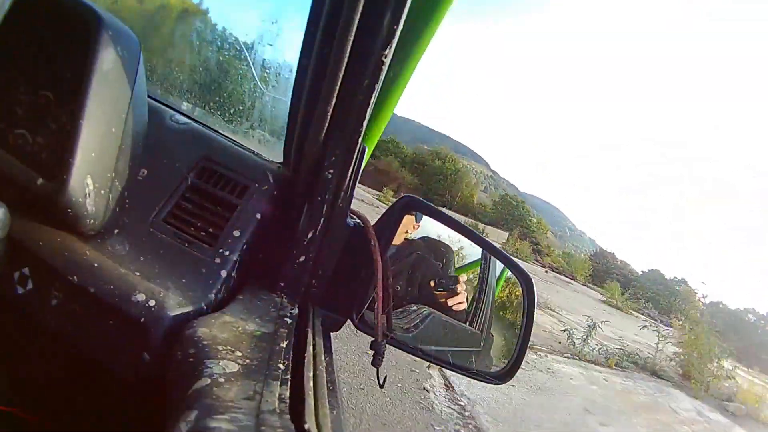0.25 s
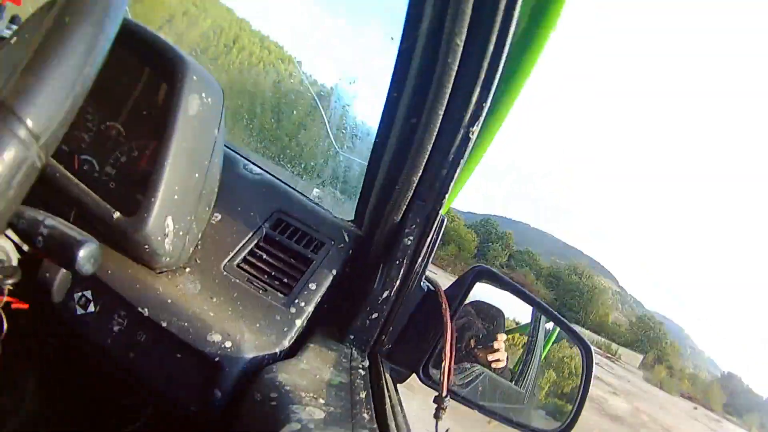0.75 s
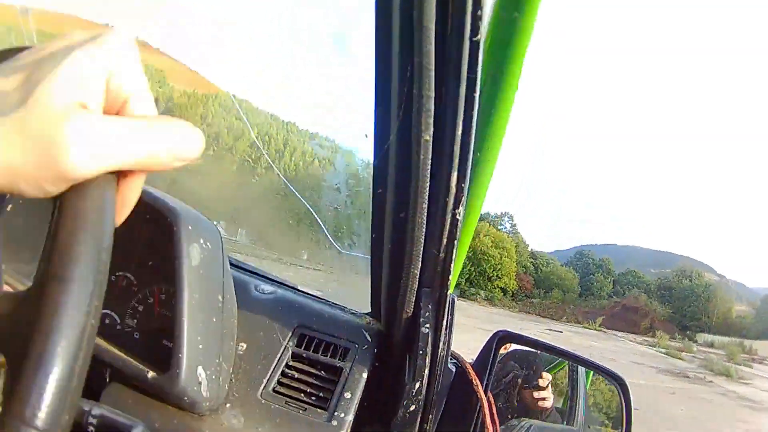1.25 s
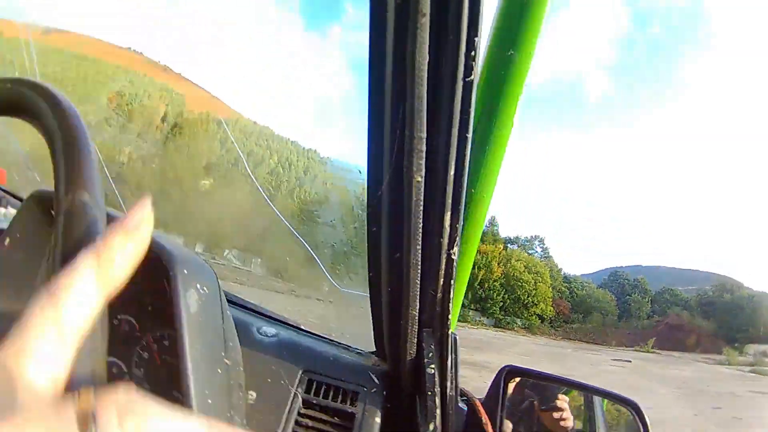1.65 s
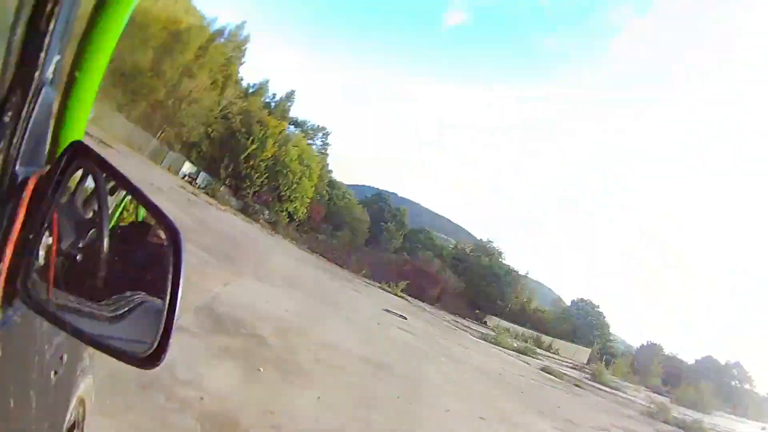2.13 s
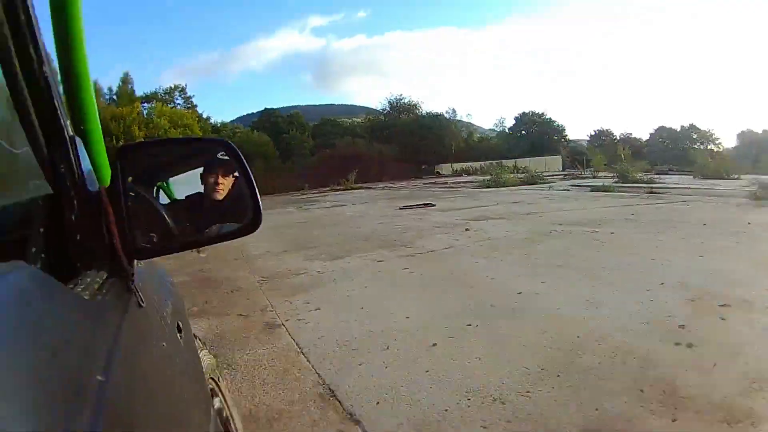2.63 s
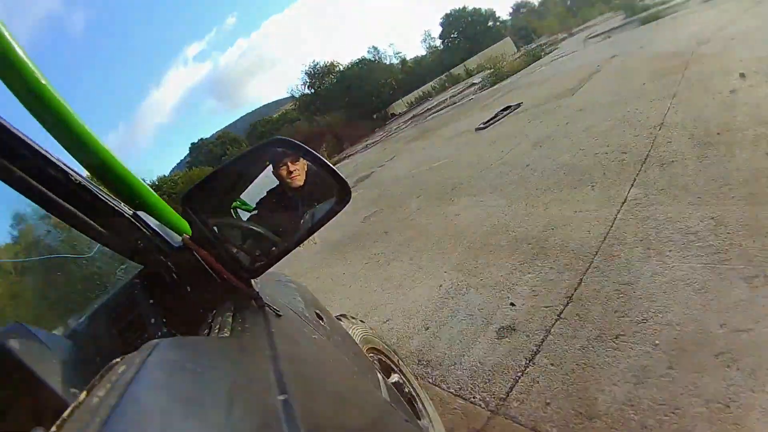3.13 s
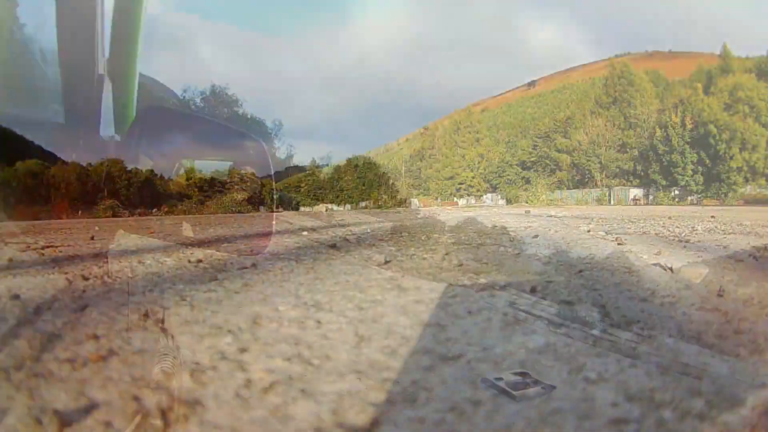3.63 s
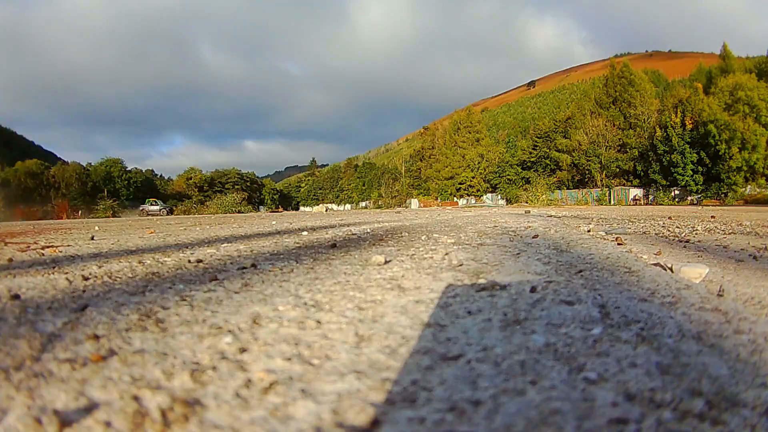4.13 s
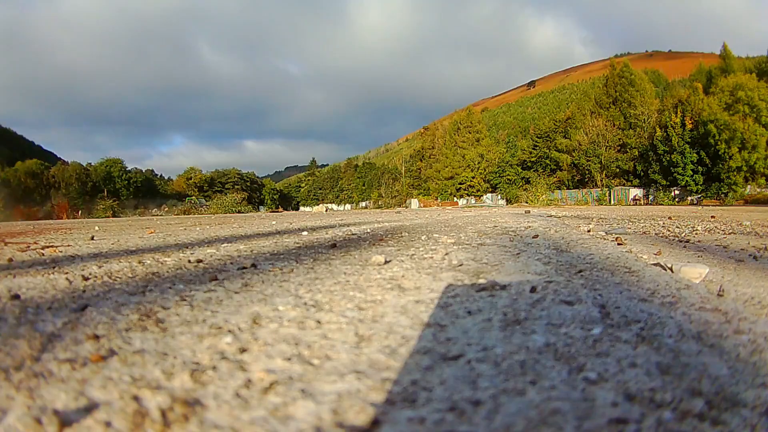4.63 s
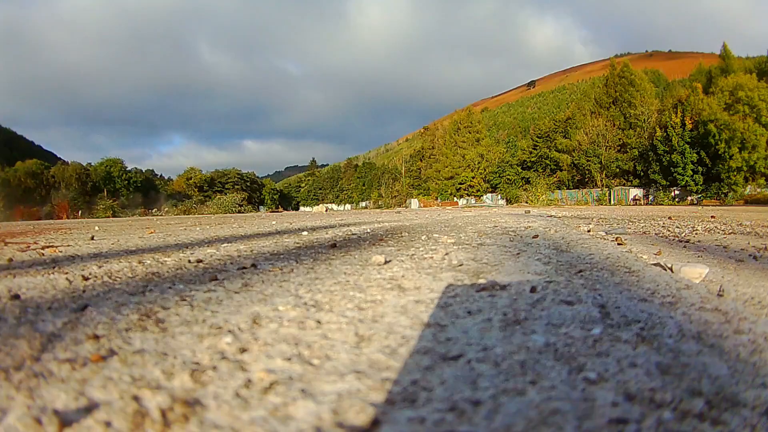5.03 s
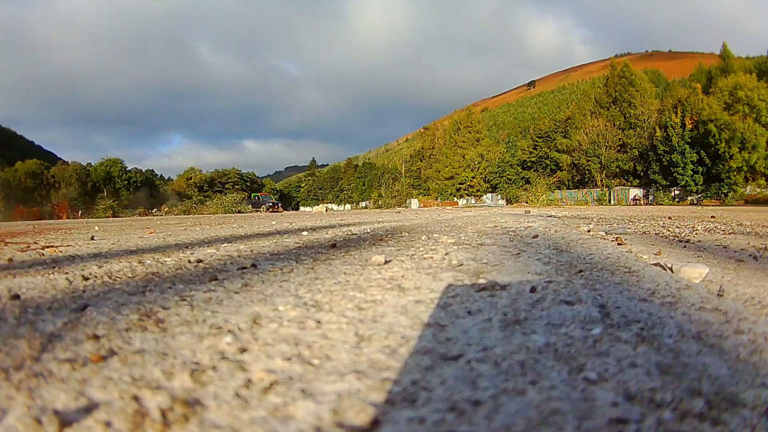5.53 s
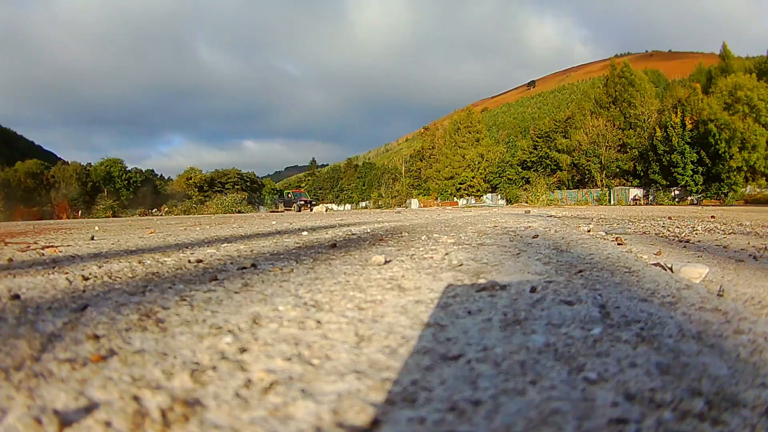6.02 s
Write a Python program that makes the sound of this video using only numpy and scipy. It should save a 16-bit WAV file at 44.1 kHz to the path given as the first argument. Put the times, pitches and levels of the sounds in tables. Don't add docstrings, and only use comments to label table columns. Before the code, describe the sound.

A small off-road car's exhaust blares and distorts up close, then suddenly sounds far across a concrete lot, revving steadily and dropping with burbles.

```python
import sys
import numpy as np
from scipy import signal
from scipy.fft import rfft, irfft, next_fast_len
from scipy.io import wavfile
from scipy.ndimage import uniform_filter1d

SR = 44100
rng = np.random.default_rng(int(sys.argv[2]) if len(sys.argv) > 2 else 0)


def field_ratio(decibels):
    return 10 ** (np.asarray(decibels, dtype=float) / 20)


def wav_record(signal):
    frames = np.transpose(np.atleast_2d(signal))
    bounded = np.clip(frames, -1, 1)
    quanta = np.round(bounded * 32767).astype(np.int16)
    wavfile.write(sys.argv[1], SR, quanta)


N = 276507
CUT_S = 3.535

# time_s, firing_hz
NEAR_FIRING = [(0.02, 152.6), (0.5, 135), (0.65, 129.6), (0.99, 120.7), (1.23, 102), (1.43, 87.7),
               (1.58, 97), (1.86, 97.4), (2.03, 99.8), (2.16, 91.4), (2.35, 104), (2.5, 102.5),
               (2.8, 108.0), (2.92, 112.6), (3.03, 98), (3.3, 90.2), (3.42, 88.4), (3.52, 100)]
FAR_FIRING = [(3.56, 119.8), (3.75, 123.8), (4.12, 135), (4.36, 141.3), (4.66, 140.1), (4.85, 145.8),
              (5.08, 143.4), (5.3, 145.5), (5.54, 143.1), (5.845, 139), (5.875, 126.8), (6.0, 110.2),
              (6.12, 87.3), (6.27, 84.5)]
# time_s, opening_0_to_1
NEAR_PEDAL = [(0.0, 0.57), (0.149, 0.93), (0.56, 0.91), (0.66, 0.7), (1.03, 0.76), (1.12, 0.97),
              (1.95, 0.92), (2.04, 0), (2.28, 0), (2.34, 0.95), (2.68, 0.97), (2.95, 0.39), (3.1, 0.03),
              (3.36, 0.25), (3.48, 0.94)]
FAR_PEDAL = [(3.55, 0.69), (3.75, 0.96), (4.5, 1), (5.2, 1.004), (5.72, 0.96), (5.84, 0.99), (5.86, 0.65),
             (6.27, 0.055)]
# centre_s, depth_db, half_width_s
THROTTLE_SNAPS = [
    (2.3, -8.5, 0.019),
    (3.36, -8, .03),
    (5.853, -14, 0.009),
]
# pitch_hz, level_db
NEAR_BOOM_LEVEL = [(88, -13.5), (100, -10), (110, -10), (126, -4), (145, -10.5)]
# time_s, level_db
TAILPIPE_FACING = [(3.6, -22.5), (3.95, -21.5), (4.249, -14), (4.6, -13), (4.75, -16), (5.2, -15),
                   (5.3, -17), (5.65, -18.5), (5.83, -21), (6.06, -23.5), (6.13, -26)]
# pitch_hz, level_db
NEAR_SILENCER = [(180, -8.5), (235, -12.5), (290, -6), (350, -23.5), (420, -20.5), (520, -20.5), (630, -15),
                 (850, -39)]
FAR_SILENCER = [(200, -24), (250, -27), (285, -24.5), (400, -27), (500, -27), (570, -24.5)]
# pitch_hz, level_db
NEAR_TAILPIPE = [(400, 0), (520, -6.5), (700, -6.5), (800, -9), (1000, -7.5), (1500, -65)]
FAR_TAILPIPE = [(600, 0), (720, 2), (850, -3), (1000, -8), (1150, -5), (1500, -10)]
# centre_s, order, level_db, half_width_s
NEAR_ORDER_SWELLS = [(0.2, 3, 9, 0.15), (0.65, 3, 7.5, 0.15), (0.85, 2, -3.5, 0.18), (1.5, 5, -3.5, 0.14),
                     (0.869, 4, 12, 0.052), (0.87, 6, 19.5, 0.042), (0.98, 3, -6, 0.12),
                     (1.25, 6, -6, 0.07), (1.961, 6, 9, 0.019), (2.2, 3, 10.5, 0.11), (2.5, 2, 4.5, .12),
                     (2.5, 5, -6, 0.18), (2.75, 3, 4.5, 0.09), (2.85, 6, 16, 0.032), (3.1, 4, 22, 0.075),
                     (3.33, 6, 29.5, 0.098), (3.35, 1, -3.5, 0.05), (3.44, 1, 8.5, 0.031)]
FAR_ORDER_SWELLS = [(3.7, 4, 5, 0.18), (4.1, 4, 7, .08), (4.2, 5, 3, 0.069), (4.72, 4, -9, 0.07),
                    (4.78, 3, -13, .13), (5.23, 4, -10, 0.042), (5.62, 4, 6, .12), (5.65, 5, 6, 0.25),
                    (5.72, 3, 7.5, .1)]
# centre_s, level_db, half_width_s
WIND_GUSTS = [
    (0.04, 6, .06),
    (0.4, 12, 0.27),
    (1.67, 8, .05),
    (2.07, 13, .1),
    (3.44, 7, .06),
]
# time_s, level_db
GROUND_SHAKE = [(0.0, -20), (0.35, -20), (0.75, -22), (1.15, -25), (1.45, -30.5), (1.75, -27), (2.0, -23),
                (2.3, -21), (2.45, -18.5), (2.7, -16), (2.87, -11.5), (2.97, -14.5), (3.2, -17),
                (3.35, -14.5), (3.53, -15)]
# centre_s, level_db, half_width_s
SMOOTH_PATCHES = [
    (1.65, -7, .15),
    (2.22, -5, 0.073),
    (2.47, -8.5, 0.16),
    (3.32, -3.5, 0.064),
]
# pitch_hz, density_db_per_hz
BODY_ROAR_COLOUR = [(60, -2.5), (120, 9.5), (300, 5.5), (650, 0.5), (1000, -14), (2500, -52)]
RATTLE_COLOUR = [(500, -4), (900, 1), (1300, -1.5), (2000, -8), (3000, -18), (4300, -19), (6000, -34),
                 (9000, -28.5)]
INTAKE_COLOUR = [(5000, -0.5), (8000, -1), (11500, 3.5), (13000, -7.5), (15500, 3), (17000, 9)]
# start_s, over_rattle_db, t60_s
BODY_JOLTS = [
    (1.167, 11, 0.068),
    (1.99, 7, 0.05),
    (3.21, 10.5, .04),
    (3.313, 16, 0.026),
]
# centre_s, level_db, half_width_s
PANEL_RUTS = [
    (0.16, 8, 0.01),
    (2.04, 15, 0.01),
    (2.13, 18, 0.043),
    (2.7, 0.5, .12),
    (2.93, 3.5, .06),
    (3.13, 7, 0.057),
    (3.31, 14, 0.037),
    (3.52, 8.5, .03),
]
# start_s, peak_db, pitch_hz, t60_s
PAN_KNOCKS = [
    (0.955, -6, 709.6, 0.21),
    (1.078, -2.5, 654, 0.17),
    (1.143, -5.5, 655, 0.18),
    (1.208, -6.5, 654, 0.4),
    (1.295, -10, 660, 0.11),
]
# pitch_hz, density_db_per_hz
FAR_ROAR_COLOUR = [(60, -20), (100, -8), (200, -3.5), (400, -4), (750, -2), (1000, -7.5), (1450, -9),
                   (1750, -18.5), (2200, -17), (2700, -26.5), (3300, -30.5), (3700, -33), (4100, -32.5),
                   (4500, -53)]
TYRE_COLOUR = [(3600, -11), (4400, -13), (5000, -5.5), (6000, -4), (7000, 0), (7800, -8), (8600, -22),
               (10000, -17), (10700, -18.5), (11500, -11), (12300, -29), (13000, -17)]
RASP_COLOUR = [(800, -9), (1200, 3), (1900, -6), (2800, -20)]
# time_s, level_db
TYRE_GRIP = [(3.56, -6), (3.63, -0.5), (3.8, -3), (3.92, -0.5), (4.75, 0), (5.2, 1.5), (5.45, 0.5),
             (5.82, 0), (5.98, -3.5), (6.27, -7)]
# start_s, peak_db, pitch_hz, t60_s
STONES_AND_BURBLES = [
    (4.805, -31, 7460, 0.014),
    (5.24, -24, 2230, .04),
    (5.243, -31, 2900, .03),
    (5.96, -50, 10300, .06),
    (5.98, -23, 521, 0.093),
    (5.995, -22, 733, 0.19),
    (6.055, -24, 700, .08),
]


def in_time(rows):
    s, value = np.transpose(rows)
    return np.interp(np.arange(N) / SR, s, value)


def at_hz(points, hz):
    point_hz, level_db = np.transpose(points)
    return np.interp(np.log(hz), np.log(point_hz), level_db)


def bumps(rows):
    t = np.arange(N) / SR
    return sum(db * np.exp(-((t - s) / width) ** 2) for s, db, width in rows)


def rms_one(x):
    return x / np.sqrt(np.mean(x ** 2) + 1e-20)


def drift(rate_hz):
    r = np.exp(-80 * np.pi * rate_hz / SR)
    slow = signal.lfilter([1], [1, -2 * r, r * r], rng.standard_normal(N // 40 + 2002))[2000:]
    return np.interp(np.arange(N) / 40, np.arange(len(slow)), rms_one(slow))


def colour(x, spectrum):
    size = next_fast_len(N)
    hz = np.maximum(np.fft.rfftfreq(size, 1 / SR), 1)
    inside = (hz > spectrum[0][0] / 2) & (hz < spectrum[-1][0])
    gain = field_ratio(at_hz(spectrum, hz)) * inside
    return rms_one(irfft(rfft(x, size) * gain, size)[:N])


def puffs(turns, depth, flicker_db):
    pulse = 1 + depth * np.cos(2 * np.pi * turns)
    return rng.standard_normal(N) * pulse * field_ratio(flicker_db * drift(34.4))


def orders(hz, boom_db, throttle, silencer, high_db, shut_db, swells, count):
    loss_db = shut_db * (1 - throttle)
    levels = [boom_db]
    for order in range(2, count + 1):
        height_db = high_db if order == 5 else at_hz(silencer, order * hz)
        levels.append(loss_db + height_db)
    levels = np.array(levels)
    for s, order, db, width in swells:
        levels[int(round(order)) - 1] += bumps([(s, db, width)])
    return levels


def exhaust(hz, levels, pipe, part, half_db, jitter_turns, waver_db, flutter_db,
            lean_turns, smear_turns, scatter_turns):
    levels = levels[:, part]
    turns = np.cumsum(hz) / SR + jitter_turns * drift(35.0)
    out = np.zeros(N)
    for order in [1, 1.5, 2, 2.5, 3, 3.5, 4, 4.5, 5, 5.5, 6, 7, 8, 9, 10, 11]:
        own_level = order <= len(levels) and order % 1 == 0 and order != 5
        if own_level:
            level_db = levels[int(order) - 1]
        else:
            level_db = levels[min(int(order), 5) - 1] + at_hz(pipe, order * hz[part])
        if order % 1 > 0:
            level_db = level_db + half_db
        chance_db = flutter_db * drift(25) if order > 3.5 else waver_db * drift(9)
        phase = order * turns + lean_turns + smear_turns * order ** 2 + scatter_turns * drift(1.61)
        out[part] += field_ratio(level_db + chance_db[part]) * np.sin(2 * np.pi * phase[part])
    return np.sqrt(2) * field_ratio(bumps(THROTTLE_SNAPS)) * out, turns


def near_exhaust(hz, throttle):
    boom_db = at_hz(NEAR_BOOM_LEVEL, hz) + 4 * (1 - throttle)
    levels = orders(hz, boom_db, throttle, NEAR_SILENCER, high_db=-25, shut_db=-20.5,
                    swells=NEAR_ORDER_SWELLS, count=6)
    return exhaust(hz, levels, NEAR_TAILPIPE, slice(0, int(CUT_S * SR) + 1), half_db=-15,
                   jitter_turns=0.013, waver_db=0.8, flutter_db=2.3,
                   lean_turns=0.5, smear_turns=0.065, scatter_turns=0.05)


def wind():
    buffet = rng.standard_normal(N) * field_ratio(1.2 * drift(12))
    level_db = np.minimum(-25 + bumps(WIND_GUSTS) + 1.5 * drift(4.5), -13)
    return field_ratio(level_db) * colour(buffet, [(18, -14), (35, -3), (60, 0), (90, -6), (200, -30)])


def body_roar(turns, throttle, swing_db):
    level_db = -12 + 0.75 * swing_db - 1.5 * (1 - throttle) + bumps(SMOOTH_PATCHES) + drift(8)
    return field_ratio(level_db - 3) * colour(puffs(turns, 0.97, 0.75), BODY_ROAR_COLOUR)


def jolts():
    t = np.arange(N) / SR
    gain = np.ones(N)
    for s, db, t60 in BODY_JOLTS:
        gain += (t > s) * field_ratio(db - 60 * np.clip((t - s) / t60, 0, 4))
    return gain


def rattle(turns, shake_db):
    chatter = colour(puffs(turns, 0.059, 0.88), RATTLE_COLOUR)
    return field_ratio(shake_db + 2 + drift(11)) * chatter * jolts()


def intake_hiss(turns, throttle):
    level_db = -38 - 8 * np.clip(1 - throttle / 0.5, 0, 1)
    return field_ratio(level_db) * colour(puffs(turns, 0.051, 0.89), INTAKE_COLOUR)


def panel(turns, swing_db):
    pitch_hz, width_hz = 1188, 85
    level_db = -22.5 + 1.31 * swing_db + bumps(PANEL_RUTS) + 2.4 * drift(9.7)
    r = np.exp(-np.pi * width_hz / SR)
    poles = [1, -2 * r * np.cos(2 * np.pi * pitch_hz / SR), r * r]
    rung = signal.lfilter([1, 0, -1], poles, puffs(turns, 0.45, 2.4))
    return field_ratio(level_db - 7) * rms_one(rung)


def struck(events):
    out = np.zeros(N)
    for s, db, hz, t60 in events:
        t = np.maximum(np.arange(N) / SR - s, 0)
        out += field_ratio(db - 60 * np.minimum(t / t60, 4)) * np.sin(2 * np.pi * hz * t)
    return out


def overloaded(x):
    rail, droop_hz, dull_hz = 0.815, 11.5, 8330
    railed = x / (1 + np.abs(x / rail) ** 12) ** (1 / 12)
    return signal.sosfilt(signal.butter(1, [droop_hz, dull_hz], "band", fs=SR, output="sos"), railed)


def on_board():
    hz, throttle, shake_db = in_time(NEAR_FIRING), in_time(NEAR_PEDAL), in_time(GROUND_SHAKE)
    swing_db = shake_db + 22
    tone, turns = near_exhaust(hz, throttle)
    hiss = intake_hiss(turns, throttle)
    air = wind() + body_roar(turns, throttle, swing_db) + rattle(turns, shake_db) + field_ratio(6.5) * hiss
    close = tone + air + panel(turns, swing_db) + struck(PAN_KNOCKS)
    return overloaded(field_ratio(7) * close) + field_ratio(-4.5) * hiss


def far_exhaust(hz, throttle):
    levels = orders(hz, in_time(TAILPIPE_FACING), throttle, FAR_SILENCER, high_db=-37, shut_db=-27.5,
                    swells=FAR_ORDER_SWELLS, count=5)
    return exhaust(hz, levels, FAR_TAILPIPE, slice(int(CUT_S * SR), N), half_db=-22,
                   jitter_turns=0.01, waver_db=0.5, flutter_db=1.5,
                   lean_turns=0.4, smear_turns=0, scatter_turns=0.12)


def far_rumble():
    rumble = colour(rng.standard_normal(N), [(15, -10), (40, 4), (70, 2), (120, -12), (250, -27)])
    return field_ratio(-41 + 2.2 * drift(6)) * rumble


def far_roar(turns, grip_db):
    return field_ratio(-29 + grip_db + 3) * colour(puffs(turns, 0.033, 0.58), FAR_ROAR_COLOUR)


def tyre_hiss(turns, grip_db):
    fade_db = -1.1 * (np.arange(N) / SR - 4.8)
    level_db = -52.5 + 1.54 * grip_db + fade_db
    return field_ratio(level_db + 4) * colour(puffs(turns, 0.14, 1.0), TYRE_COLOUR)


def whine():
    start_s, bursts_hz, pitch_hz = 3.538, 54.0, 13749
    t = np.arange(N) / SR
    gate = ((t - start_s) * bursts_hz % 1 < 0.72) * 1.0
    return field_ratio(-59) * uniform_filter1d(gate, size=40) * np.sin(2 * np.pi * pitch_hz * t)


def tailpipe_rasp(turns):
    level_db = -51 + bumps([(5.45, 17, 0.4)])
    return field_ratio(level_db) * colour(puffs(turns, 0.3, 1.2), RASP_COLOUR)


def far_off():
    hz, throttle, grip_db = in_time(FAR_FIRING), in_time(FAR_PEDAL), in_time(TYRE_GRIP)
    tone, turns = far_exhaust(hz, throttle)
    ground = far_rumble() + far_roar(turns, grip_db) + tyre_hiss(turns, grip_db)
    preamp_noise = field_ratio(-60) * rng.standard_normal(N)
    return tone + ground + whine() + struck(STONES_AND_BURBLES) + tailpipe_rasp(turns) + preamp_noise


def scene():
    on_car = np.arange(N) < CUT_S * SR
    return np.where(on_car, on_board(), far_off())[None]


def top_cut(x):
    return signal.sosfilt(signal.butter(12, 16290, fs=SR, output="sos"), x)


def record(dry):
    limited = np.clip(dry, -1, 1)
    mix = signal.sosfilt(signal.cheby2(10, 50, 16300, fs=SR, output="sos"), limited)
    return top_cut(mix)


dry = scene()
out = record(dry)
wav_record(out)
```